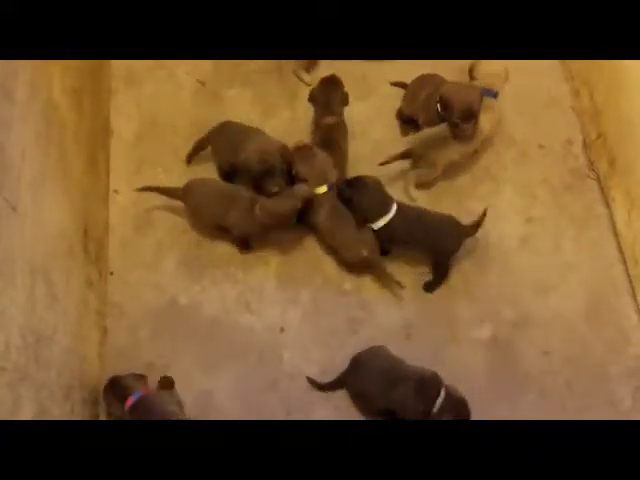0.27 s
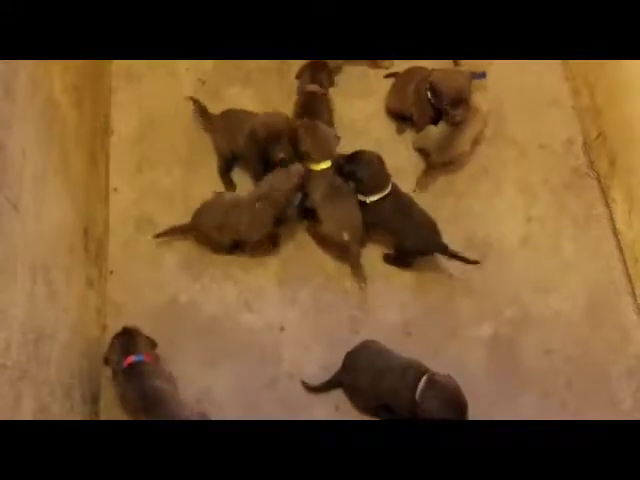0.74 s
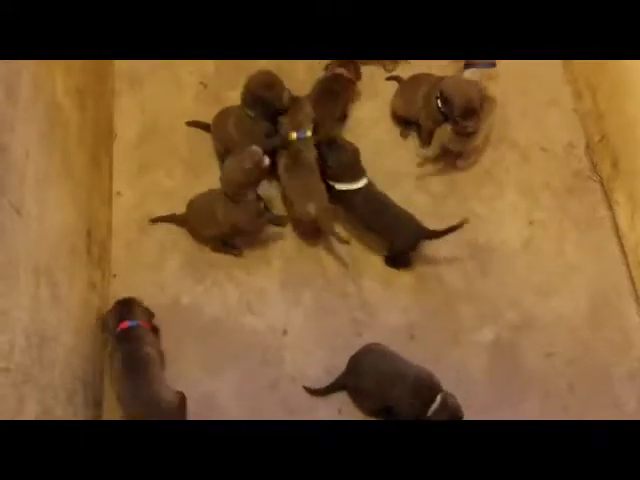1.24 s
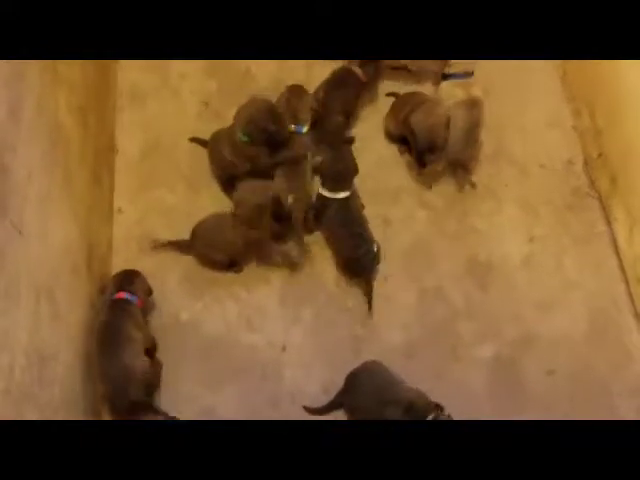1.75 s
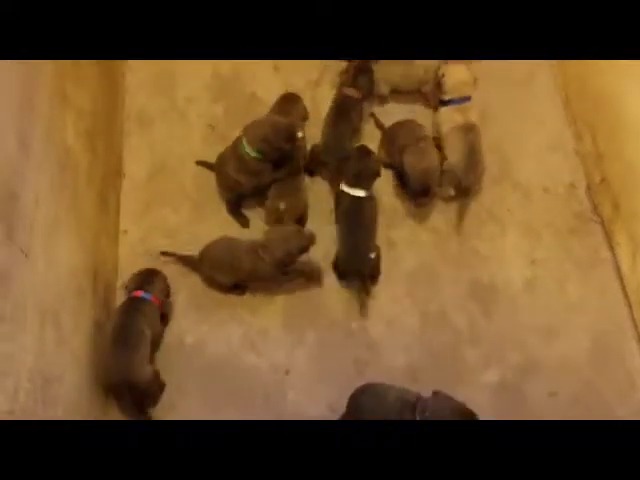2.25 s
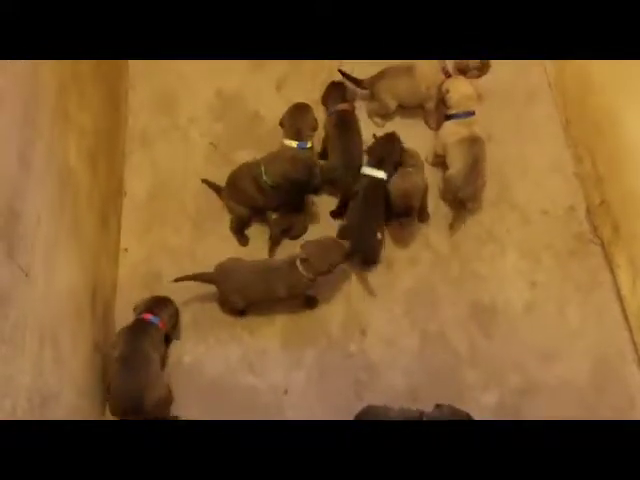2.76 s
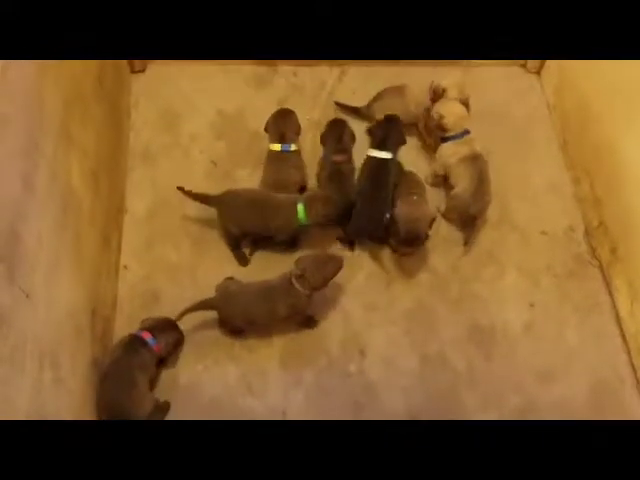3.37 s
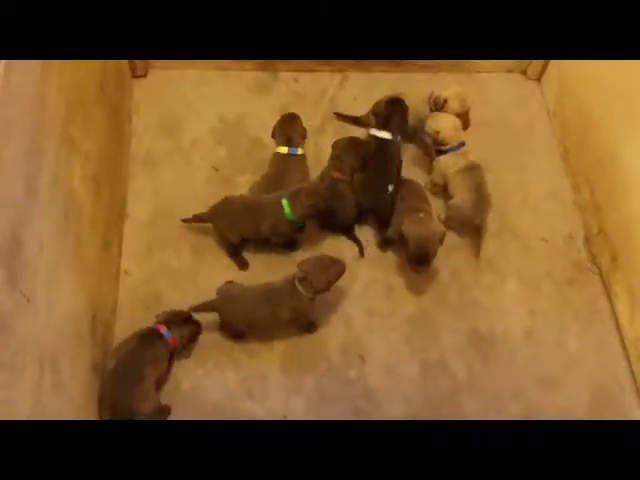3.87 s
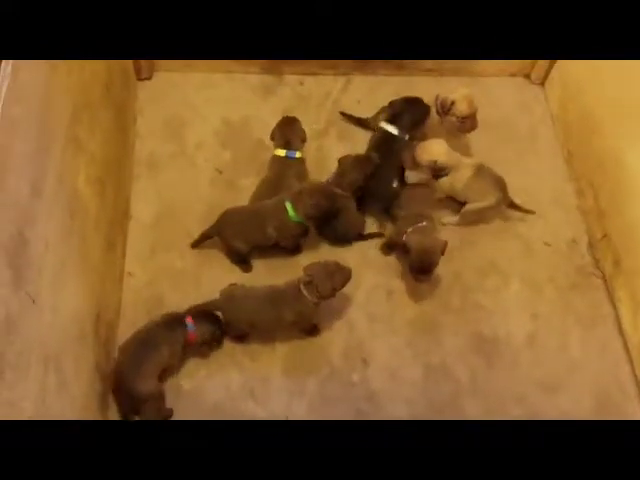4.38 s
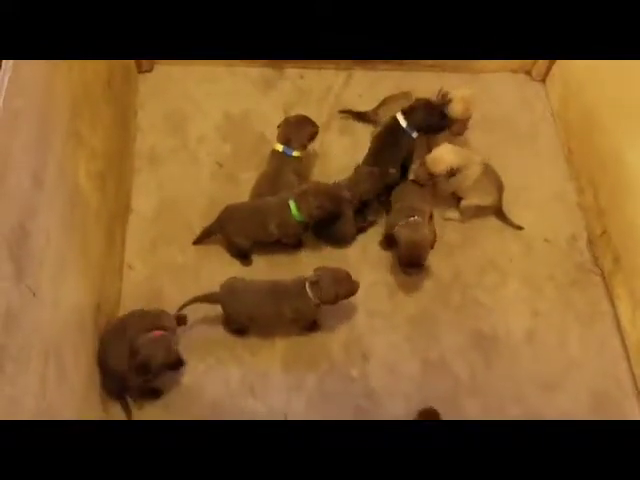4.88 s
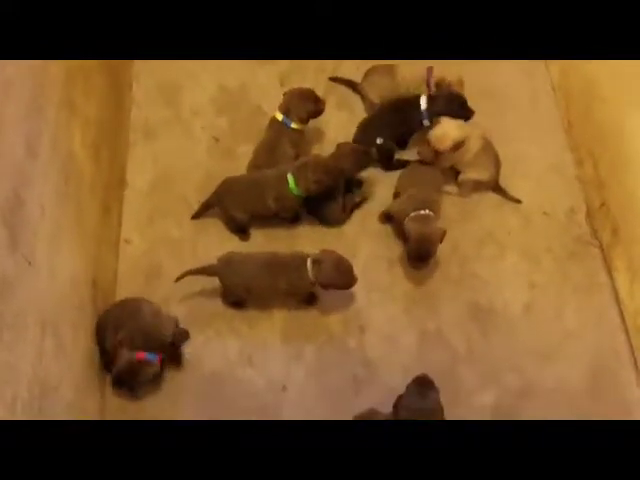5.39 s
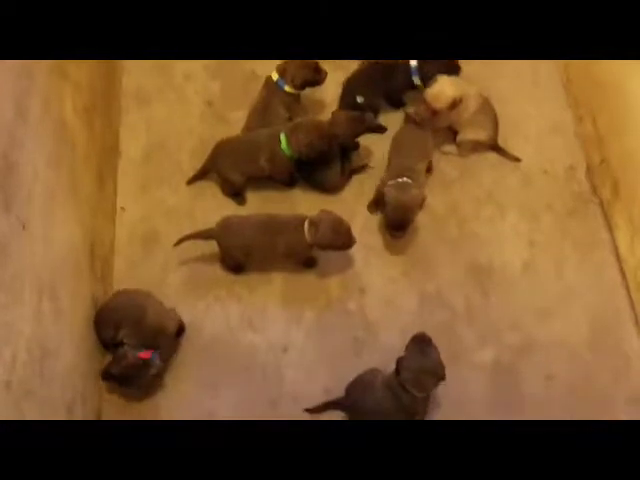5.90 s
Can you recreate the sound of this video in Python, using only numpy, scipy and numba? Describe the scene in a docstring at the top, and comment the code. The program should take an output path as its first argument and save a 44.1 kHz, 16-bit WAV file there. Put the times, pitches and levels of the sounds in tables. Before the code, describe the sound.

A litter of young puppies in a bare, echoing indoor pen, heard in stereo over faint, wavering low rumble and hiss. Light scuffs open; at about 0.3 s a puppy gives a loud, piercing yelp that leaps upward, turns harsh and raspy, and ends near 0.6 s, with a short dense echo. Only faint scuffing follows until tiny hoarse whimpers at 1.6 and 1.9 s, then brief squeaks breaking into rasp at 2.2 and 2.5 s. From 2.8 to 3.5 s a wavering whine runs on, strongest around 3.25 s, with low thumps from 3.35 s. A lower, grumbling whimper sinks from 3.6 to 4 s. Paw scuffs and bumps cluster around 4.2-4.45 s, a small whimper comes at 4.75 s, and a thin high squeak rises and falls at 5.0-5.3 s. Soft scuffs and crisp claw ticks at 5.7, 5.9 (the sharpest) and 6.1 s close it.

```python
"""Puppies in a concrete pen

A loud yelp comes first, then short whines follow, ranging from clean squeaks to a hoarse rasp.
Voices are vocal-fold pulses and noise, sent through resonances of throat and mouth, with a breath hiss.
Paw scuffs and low grunts or thumps are bursts of gritty noise; claws tick as short rings set off by skids.
The walls answer with dense fading echoes. Under it all lies a low, wavering background noise.
"""
import sys
import numpy as np
from scipy import signal
from scipy.fft import rfft, irfft, next_fast_len
from scipy.io import wavfile
from scipy.ndimage import uniform_filter1d, minimum_filter1d
from numba import njit

SR = 44100
rng = np.random.default_rng(int(sys.argv[2]) if len(sys.argv) > 2 else 0)


def store_pcm(level_fs):
    """Save levels as 16-bit WAV."""
    pcm = np.round(np.clip(level_fs, -1, 1) * 32767).astype(np.int16)
    wavfile.write(sys.argv[1], SR, np.atleast_2d(pcm).T)


N = 270333  # length of the scene in samples


def amp(db):
    """Turn decibels into a gain."""
    return 10 ** (np.asarray(db) / 20)


def rms_one(x):
    """Scale a sound so that its average strength (rms) is 1."""
    return x / np.sqrt(np.mean(x ** 2) + 1e-20)


def at_hz(points, hz):
    """Read a table between its points, on a logarithmic frequency axis."""
    table_hz, values = np.array(points).T
    return np.interp(np.log(np.maximum(hz, 1)), np.log(table_hz), values)


def colour(x, gain):
    """Make each frequency stronger or weaker by gain(Hz)."""
    size = next_fast_len(x.shape[-1], real=True)
    spectrum = rfft(x, size) * gain(np.fft.rfftfreq(size, 1 / SR))
    return irfft(spectrum, size)[..., :x.shape[-1]]


def wander(size, rate):
    """Random drift: noise smoothed twice, to about `rate` changes a second, with rms 1."""
    r = np.exp(-2 * np.pi * rate / SR)
    settling = 4000  # opening samples thrown away
    noise = rng.standard_normal(size + settling)
    return rms_one(signal.lfilter([1], [1, -2 * r, r * r], noise)[settling:])


@njit
def resonate(x, hz, width_hz, sr):
    """Two-pole resonance, gain about 1 at its centre, which can move from sample to sample."""
    y = np.zeros(len(x))
    r = np.exp(-np.pi * width_hz / sr)
    for i in range(2, len(x)):
        push = (1 - r * r) / 2 * (x[i] - x[i - 2])
        swing = 2 * r * np.cos(2 * np.pi * hz[i] / sr) * y[i - 1] - r * r * y[i - 2]
        y[i] = push + swing
    return y


def cavity(x, hz, width_hz):
    """A hollow's resonance, passed twice so that the valleys beside it stay dark."""
    hz = hz + np.zeros(len(x))
    once = resonate(x, hz, width_hz, SR)
    return resonate(once, hz, width_hz, SR)


# Level of the background noise over time: t/s, level/dB (before the random waver)
BACKGROUND_LEVEL = [(0.0, -56.5), (0.27, -53), (0.78, -63), (1.25, -59.5), (1.6, -55.5), (2.4, -58.5),
                    (3.31, -54.5), (3.94, -52.5), (4.461, -63), (4.8, -56), (5.16, -51.5), (5.6, -61),
                    (6.13, -55.5)]
# Tone of the background noise: f/Hz, relative level/dB (per Hz)
BACKGROUND_TONE = [(15, -38), (25, -3), (49, -9), (156, 1), (260, -12.5), (322, -8.5), (598, -15),
                   (871, -12), (1380, -22), (1750, -18), (4870, -33.5), (9300, -34), (10600, -36.5),
                   (14300, -37.5), (15500, -47.5)]
# How alike left and right are, for the background and for the wall echoes: f/Hz, likeness (0-1)
LEFT_RIGHT_LIKENESS = [(60, .9), (180, .94), (350, .85), (700, .4), (2000, .2), (8000, .1)]


def background():
    """Low rumble and hiss: wavering noise, alike at left and right mostly in the bass."""
    mid, side = rng.standard_normal((2, N))
    mid = colour(mid, lambda hz: amp(at_hz(BACKGROUND_TONE, hz)) * np.sqrt(1 + at_hz(LEFT_RIGHT_LIKENESS, hz)))
    side = colour(side, lambda hz: amp(at_hz(BACKGROUND_TONE, hz)) * np.sqrt(1 - at_hz(LEFT_RIGHT_LIKENESS, hz)))
    left_right = rms_one(np.array([mid + side, mid - side]))
    level_db = np.interp(np.arange(N) / SR, *np.transpose(BACKGROUND_LEVEL))
    waver_db = 2.2 * wander(N, 1.3)
    return amp(level_db + waver_db) * left_right


# Paw scuffs and low grunts or thumps, all made as bursts of noise: t/s,
# level/dB (of the grit before its swell and fade), fade time/s,
# brightness/dB per octave (flattening out in the bass)
SCUFFS_AND_THUMPS = [(0.053, -55.5, 0.038, -6.5), (0.16, -48.5, 0.069, -10), (0.899, -54.5, 0.039, -8.5),
                     (0.93, -61.5, 0.031, -11.5), (1.099, -65.5, 0.059, 1.5), (1.34, -64, 0.05, -8),
                     (2.12, -58.5, 0.08, -9), (2.388, -70, 0.045, 2), (3.35, -42.5, 0.025, -11),
                     (3.504, -48, 0.037, -7.5), (3.625, -45, 0.03, -11), (4.209, -58.5, 0.05, -10),
                     (4.252, -46, 0.03, -6.5), (4.347, -49.5, 0.066, -8), (4.439, -56.5, 0.06, -9.5),
                     (4.757, -51, 0.022, -6), (4.888, -53.5, 0.084, -12), (5.349, -55, 0.037, -15),
                     (5.499, -67.5, 0.048, 4), (5.659, -62.5, 0.042, -4), (5.849, -64.5, 0.033, 0),
                     (5.97, -56, 0.078, -7.5)]


def scuffs_and_thumps():
    """Each scuff, grunt or thump is gritty noise that swells fast and then dies away."""
    out = np.zeros(N)
    size = 6000  # samples, long enough for each burst to fade
    for s, level_db, fade_s, tilt_db in SCUFFS_AND_THUMPS:
        t = np.arange(size) / SR / fade_s  # time counted in fade times
        grit = rng.standard_normal(size) * amp(3.0 * wander(size, 200))
        # the last factor thins the bass below about 300 Hz
        grit = rms_one(colour(grit, lambda hz: amp(tilt_db * np.log2(hz / 1000 + 0.51)) * hz / (hz + 300)))
        swell_and_fade = np.minimum(4 * t, 1) * np.exp(-t * t)
        start = round((s - .006) * SR)  # the swell begins before the listed time
        out[start:start + size] += (amp(level_db) * grit * swell_and_fade)[:N - start]
    return out


# Time for the wall echoes to fall by 60 dB: f/Hz, fall time/s
ECHO_FALL = [(300, 0.67), (1000, 0.37), (2500, 0.36), (6000, 0.39), (12000, 0.37)]
FIRST_WALL_S, LEFT_LAG_S = .0055, .00012  # earliest echo; extra delay of direct sound at the left port


def pen(x):
    """Direct sound reaches the left port later; dense wall echoes die away band by band."""
    t = np.arange(SR) / SR
    white = rng.standard_normal((2, SR))
    low_edges = 100 * 2 ** np.arange(8.)  # octave bands from 100 Hz up
    echoes = 0
    for low, high in zip(low_edges, np.minimum(low_edges * 2, .45 * SR)):
        centre = np.sqrt(low * high)
        band = signal.sosfilt(signal.butter(2, [low, high], "band", fs=SR, output="sos"), white)
        alike = at_hz(LEFT_RIGHT_LIKENESS, centre)  # long waves reach both ports alike
        band[1] = alike * band[0] + np.sqrt(1 - alike ** 2) * band[1]
        t60 = at_hz(ECHO_FALL, centre)
        echoes = echoes + band * amp(-60 * t / t60) / np.sqrt(t60)
    echoes = echoes * (t > FIRST_WALL_S)
    # the echoes together carry as much energy as the direct sound
    response = echoes / np.sqrt(np.sum(echoes ** 2) / 2)
    response[0, round(LEFT_LAG_S * SR)] += 1
    response[1, 0] += 1
    return signal.fftconvolve(x[None], response, axes=1)[:, :N]


# Registers of the voice, as roughness from 0 to 1
CLEAR, REEDY, HUSKY, HARSH, HOARSE = .05, .2, .33, .5, .75
# One row per cry, part of a cry, or second voice sounding along with it: roughness, throat f/Hz and
# mouth f/Hz (at the row's mean pitch), front cavity over throat level/dB, breath level/dB (at the
# loudest moment), then a contour of points: t/s, pitch f/Hz (before jitter), voice level/dB
# (before throb), mouth over throat level/dB (how open the mouth is)
PUPPY_CRIES = [ (CLEAR, 1070, 1830, 4.4, -31, [(0.275, 854, -31, 16), (0.287, 905.5, -11.5, 24),
               (0.297, 980, -8.5, 32.5)]), (HUSKY, 1570, 1827, 7.5, -17, [(0.297, 1031, -9, 27.5),
               (0.341, 1312, -16.5, 19), (0.385, 1314, -17, 13)]),
               (REEDY, 1100, 1900, -10.5, -22, [(0.362, 1325, -29, 23), (0.386, 1553, -7.5, 35),
               (0.416, 1544, -12, 16), (0.5, 1447, -28.5, 16)]),
               (HARSH, 1800, 1700, 25, -30, [(0.385, 1296, -11.5, 36), (0.441, 1281, -14.5, 32),
               (0.473, 1153, -12, 35), (0.556, 1102, -20.5, 47.5)]),
               (HARSH, 976, 1430, 9, -71, [(0.564, 628, -33.5, 12.5), (0.588, 635.4, -25.5, 4),
               (0.63, 621.8, -41.5, 17)]), (CLEAR, 1030, 1900, 2, -60, [(1.62, 972, -78.5, 10),
               (1.636, 1057, -49, 12), (1.648, 1125, -49, 9.5)]),
               (HOARSE, 705, 1645, -18, -60.5, [(1.648, 966, -40.5, 20.5), (1.688, 836, -39, 13.5),
               (1.75, 797, -52.5, 6)]), (HOARSE, 666, 1704, -17.5, -64, [(1.895, 511.2, -51.5, 11.5),
               (1.927, 505, -45.5, 8.5), (1.953, 411.4, -44, 0.5), (2.0, 415, -50, 4.5)]),
               (CLEAR, 1100, 1990, -1, -57.5, [(2.18, 873, -57.5, 21), (2.194, 1002, -38, 10),
               (2.226, 1150, -39, -4.5)]), (HOARSE, 650, 1670, -21, -54, [(2.226, 975, -34, 11.5),
               (2.26, 867, -47.5, 1.5), (2.3, 799, -55, -7.5)]),
               (CLEAR, 1070, 1920, 0, -54, [(2.503, 1036, -59, 4), (2.519, 1109, -37, 2),
               (2.538, 1013, -51, -4)]), (HOARSE, 760, 1670, -13, -65, [(2.538, 824, -46.5, 18),
               (2.57, 860, -46, 2), (2.63, 834, -60, 5.5)]),
               (HOARSE, 1220, 1930, -8, -59, [(2.81, 1150, -62, 10.5), (2.825, 1185, -52.5, 3.5),
               (2.834, 1180, -40.5, 4)]), (REEDY, 1090, 1830, -21.5, -58.5, [(2.834, 929, -45, 10),
               (2.9, 1170, -47.5, 6.5), (2.942, 1003, -42, 14.5), (3.012, 883, -45.5, -3),
               (3.05, 842, -39.5, -9.5)]), (REEDY, 1030, 1600, -2.5, -69, [(3.205, 1036, -68, 17),
               (3.217, 1066, -45, 4.5), (3.224, 1050, -48, 2)]),
               (CLEAR, 930, 1590, -21, -56.5, [(3.224, 726, -37, 8.5), (3.246, 842, -26.5, 19),
               (3.265, 1002, -39, 24)]), (REEDY, 915, 2030, -12.5, -49.5, [(3.265, 1058, -38.5, -12),
               (3.291, 1232, -53, 4), (3.333, 1243, -44.5, -2), (3.367, 1117, -47.5, 4),
               (3.41, 935, -38, -0.5)]), (HUSKY, 880, 1640, -28, -57.5, [(3.41, 860, -36, 24),
               (3.417, 827, -29.5, 24), (3.426, 814, -39, 4), (3.47, 857.6, -42, -8), (3.49, 810, -49, 0)]),
               (HOARSE, 816, 1600, -34.5, -63.5, [(3.605, 543, -56, 8), (3.627, 525, -40.5, 10),
               (3.665, 526.7, -38, 12.5), (3.683, 546, -44, 11), (3.695, 562, -35, 13),
               (3.71, 557, -46, 2)]), (HUSKY, 850, 1560, -28, -62.5, [(3.71, 509, -43, 8),
               (3.74, 508.3, -35, 24), (3.8, 507.8, -35.5, 17.5), (3.896, 465.5, -42, 14),
               (4.0, 449.7, -46.5, 3.5), (4.02, 437, -63.5, 7.5)]),
               (REEDY, 1420, 1460, -11, -61.5, [(4.725, 600, -52.5, 15), (4.761, 620, -53.5, 14.5),
               (4.787, 713, -40, 9), (4.8, 675, -55.5, 1), (4.85, 678, -52, 8.5)]),
               (REEDY, 2100, 1150, -13.5, -66.5, [(5.022, 1600, -50, 12.5), (5.044, 1747, -44, 8.5),
               (5.075, 1950, -51.5, 14.5)]), (REEDY, 1290, 1440, -4.5, -62, [(5.03, 1048, -60.5, 17),
               (5.102, 1510, -38, 6.5), (5.134, 1378, -50.5, -9), (5.174, 1373, -47.5, 6.5),
               (5.214, 1172, -53, 16.5), (5.23, 990, -40.5, 3.5)]),
               (HUSKY, 880, 1680, -19, -61.5, [(5.23, 907, -43.5, 9.5), (5.258, 806.5, -37.5, 0.5),
               (5.28, 793.3, -45, -14.5), (5.35, 868, -59, -4)]),
               (CLEAR, 430, 1660, -21.5, -87, [(5.63, 493, -74, -25.5), (5.658, 503, -49, -23),
               (5.675, 490, -68, -22)]), ]
# Hiss of breath past the tongue: f/Hz, relative level/dB (per Hz), heard only above 2500 Hz
BREATH_TONE = [(1530, -41.5), (2600, -22), (2970, -12.5), (3600, -10), (4000, -8), (4350, -20),
               (4900, -18.5), (5400, -13), (5900, -14), (6680, -9), (7690, -26.5), (9240, -17.5),
               (10200, -43), (11800, -38.5), (14000, -55)]
# The softer the cry, the brighter its hiss: f/Hz, gain/dB per dB of softness
SOFT_CRY_SHEEN = [(7000, 0.0), (9000, 0.16), (10200, 0.57), (11500, 0.25)]
THROAT_WIDTH_HZ, MOUTH_WIDTH_HZ = 400, 330  # widths for one of the two passes, as are those below
FRONT_HZ, FRONT_WIDTH_HZ, CHEST_HZ, CHEST_WIDTH_HZ = 2400, 500, 510, 100.0
# Throat and mouth shift with the pitch (as powers of it); breath dB follows voice dB by its share
THROAT_FOLLOWS, MOUTH_FOLLOWS, BREATH_FOLLOWS = 0.41, 0.21, 0.67


def cry(rough, throat_hz, mouth_hz, front_db, breath_db, contour):
    """Vocal-fold pulses, jittery and noisy when hoarse, ring throat and mouth; breath hisses on top."""
    s, *columns = np.transpose(contour)
    i = np.arange(round(s[0] * SR), round(s[-1] * SR))
    pitch, level_db, mouth_db = [np.interp(i / SR, s, column) for column in columns]
    strain = pitch / pitch.mean()
    below_peak_db = level_db - level_db.max()

    jitter = .2 * rough ** 1.5 * wander(len(i), 120)
    phase = 2 * np.pi * np.cumsum(pitch * (1 + jitter)) / SR
    # up to twelve harmonics, kept where the listed pitch puts them below 6000 Hz
    pulses = sum(np.cos(k * phase) * (k * pitch < 6000) / k ** .5 for k in range(1, 13))
    gate = (1 + np.cos(phase)) / 2  # air passes while the folds are open
    fold_noise, breath_noise = rng.standard_normal((2, len(i)))
    folds = (1 - .7 * rough) * pulses + 3 * rough ** 2 * gate * fold_noise

    throat = cavity(folds, throat_hz * strain ** THROAT_FOLLOWS, THROAT_WIDTH_HZ)
    mouth = amp(mouth_db) * cavity(folds, mouth_hz * strain ** MOUTH_FOLLOWS, MOUTH_WIDTH_HZ)
    front = amp(front_db) * cavity(folds, FRONT_HZ, FRONT_WIDTH_HZ)
    chest = amp(-16.5) * cavity(pulses, CHEST_HZ, CHEST_WIDTH_HZ)
    voice = throat - mouth + front + chest
    # even out the strength, so that the contour sets the level
    voice = voice / np.sqrt(uniform_filter1d(voice ** 2, size=1300) + 1e-9)

    def breath_gain(hz):
        tone_db = at_hz(BREATH_TONE, hz) - level_db.max() * at_hz(SOFT_CRY_SHEEN, hz)
        return amp(tone_db) * (hz > 2500)

    overtones = .55 * (1 - rough) * pulses + (.4 + rough) * gate * breath_noise
    hiss = rms_one(colour(overtones, breath_gain))

    throb = amp(8 * np.sqrt(rough) * np.tanh(wander(len(i), 35)))  # hoarse folds catch and slip
    edges = np.clip(np.minimum(i - i[0], i[-1] - i) / (.003 * SR), 0, 1)  # 3 ms fades
    breath_level = amp(breath_db + BREATH_FOLLOWS * below_peak_db)
    out = np.zeros(N)
    out[i] = throb * edges * (amp(level_db) * voice + breath_level * hiss)
    return out


# Claws touching concrete: t/s, peak level/dB (before the walls answer)
CLAW_TICKS = [(4.7585, -51), (5.7397, -44), (5.9316, -32.5), (6.106, -41)]
# Ringing tones of a claw: f/Hz, relative level/dB (at the start), time to fall by 60 dB/s
CLAW_MODES = [(4310, 5, 0.0061), (5390, 10.5, 0.0028), (7170, 5.5, 0.0049), (9350, 4, 0.003),
              (13500, -8.5, 0.00088)]


def claws():
    """A skid of a few milliseconds rings the short tones of a claw."""
    out = np.zeros(N)
    t = np.arange(1000) / SR
    ring = sum(amp(db - 60 * t / t60) * np.sin(2 * np.pi * hz * t) for hz, db, t60 in CLAW_MODES)
    for s, peak_db in CLAW_TICKS:
        skid = rng.standard_normal(len(t)) * t * np.exp(-t / .0025)
        tick = np.convolve(skid, ring)
        tick = amp(peak_db) * tick / np.abs(tick).max()
        start = round(s * SR - 130)  # the skid begins about 3 ms before the listed time
        out[start:start + len(tick)] += tick[:N - start]
    return out


# Shading by the recorder's body: f/Hz, left over right level/dB
BODY_SHADING = [(200, 2.5), (700, -2), (1290, 2.5), (2380, 1.5), (4400, -5), (8120, -14), (14000, 5)]
CLAW_ECHO_DB = -1  # wall echoes of the claws, against those of the voices


def scene():
    """Puppies in the pen, shaded left to right, over the background; near claws raise fewer echoes."""
    ticks = claws()
    echoing_share = amp(CLAW_ECHO_DB)  # the rest of each tick skips the walls
    puppies = sum(cry(*entry) for entry in PUPPY_CRIES)
    heard = pen(puppies + scuffs_and_thumps() + echoing_share * ticks) + (1 - echoing_share) * ticks
    # half of the difference goes to each side
    shaded = colour(heard, lambda hz: amp(at_hz(BODY_SHADING, hz) * [[.5], [-.5]]))
    return shaded + background()


CUTOFF_HZ = 15650


def record(dry):
    """A limiter eases the gain down around peaks, the deepest bass rolls off, the top is cut steeply."""
    room_left = np.minimum(.9 / (np.abs(dry).max(axis=0) + 1e-9), 1)
    gain = uniform_filter1d(minimum_filter1d(room_left, size=441), size=441)  # 10 ms windows
    thinned = signal.sosfilt(signal.butter(2, 35, "high", fs=SR, output="sos"), dry * gain)
    return signal.sosfilt(signal.ellip(12, .3, 70, CUTOFF_HZ, fs=SR, output="sos"), thinned)


dry = scene()
out = record(dry)
store_pcm(out)
```